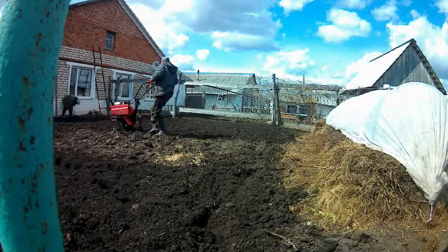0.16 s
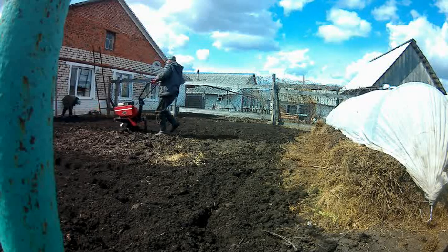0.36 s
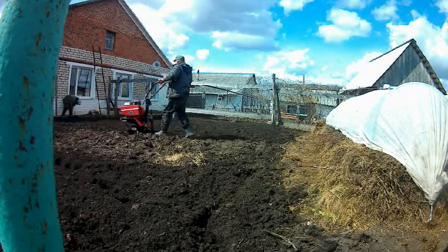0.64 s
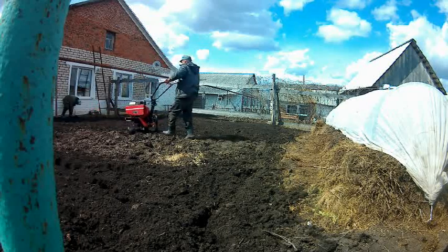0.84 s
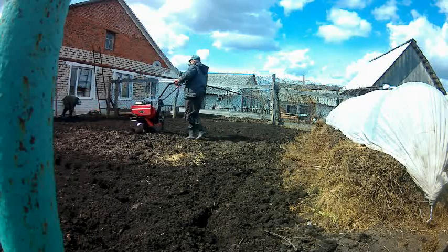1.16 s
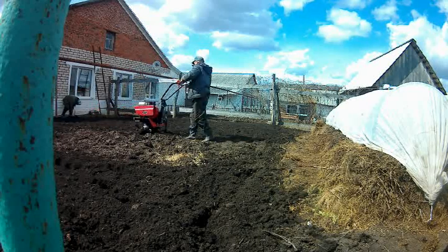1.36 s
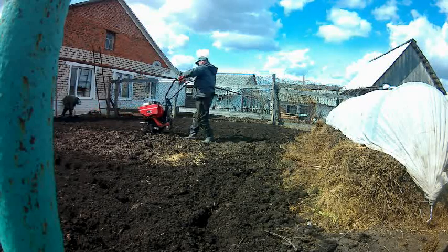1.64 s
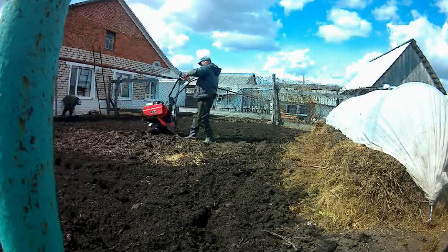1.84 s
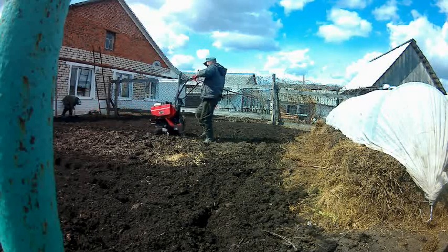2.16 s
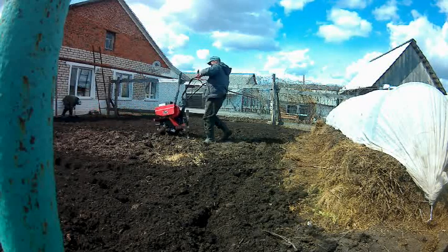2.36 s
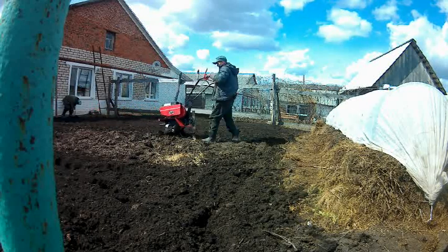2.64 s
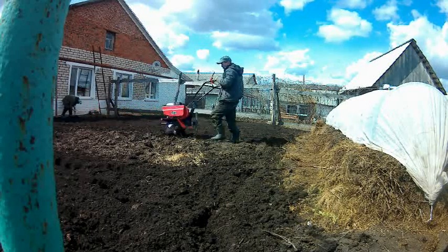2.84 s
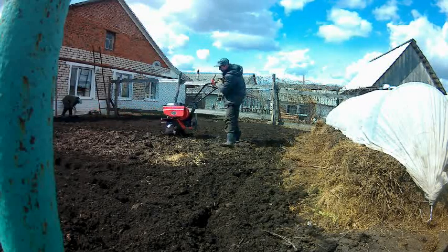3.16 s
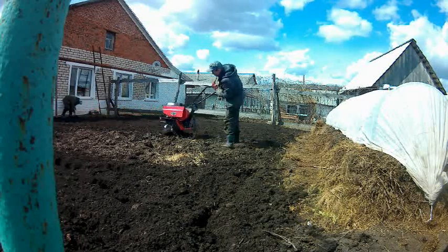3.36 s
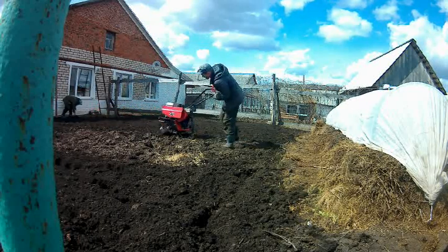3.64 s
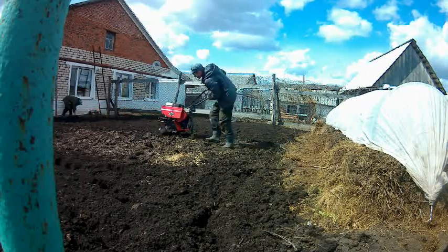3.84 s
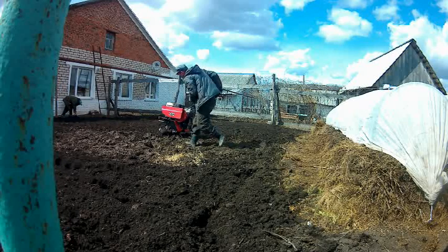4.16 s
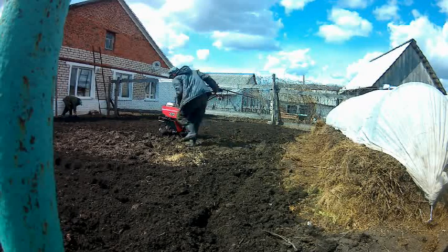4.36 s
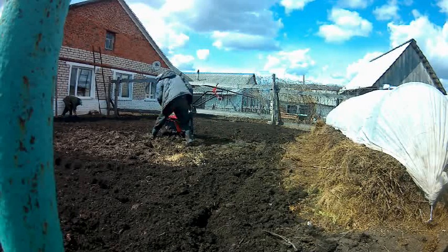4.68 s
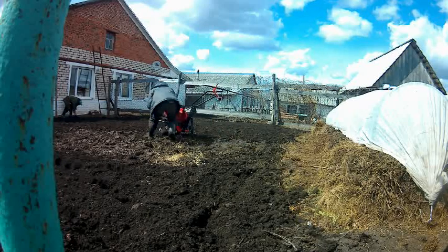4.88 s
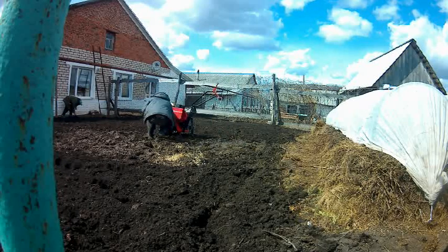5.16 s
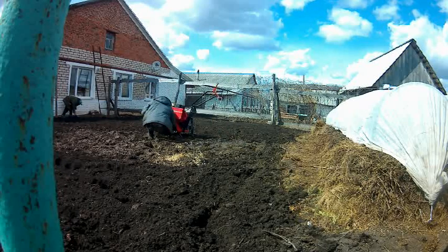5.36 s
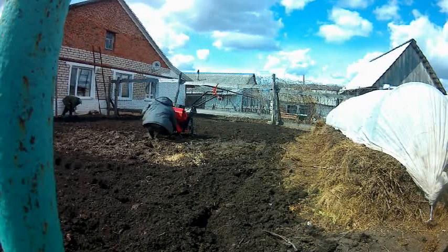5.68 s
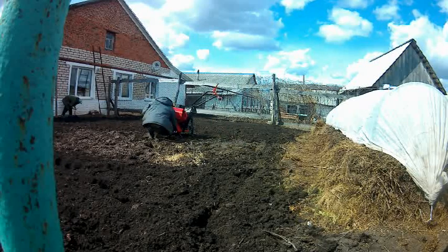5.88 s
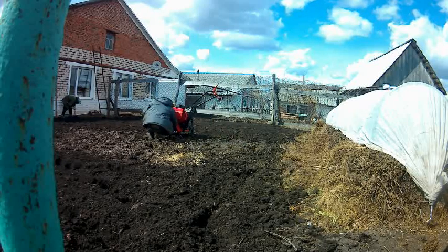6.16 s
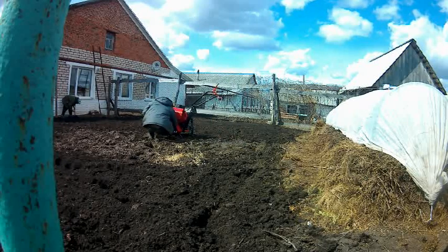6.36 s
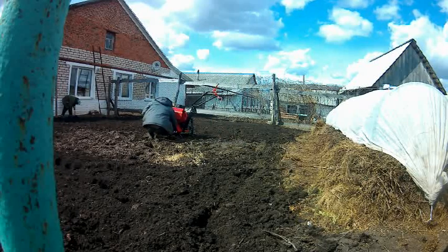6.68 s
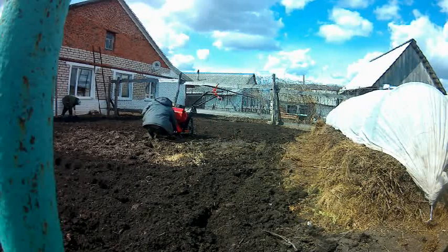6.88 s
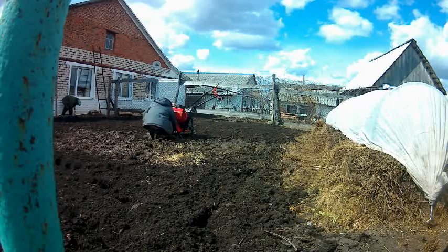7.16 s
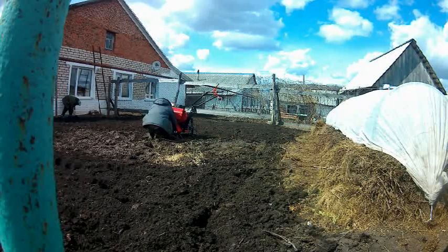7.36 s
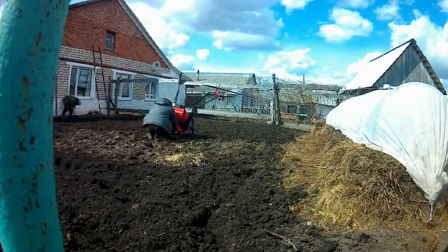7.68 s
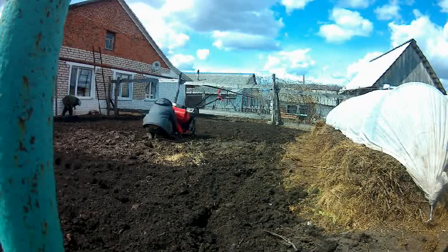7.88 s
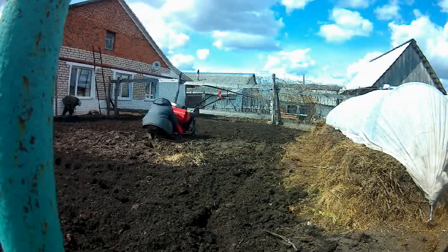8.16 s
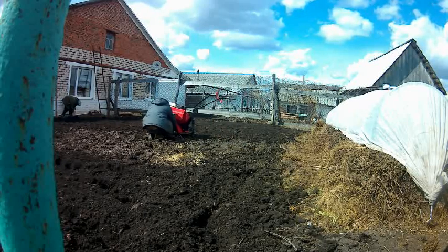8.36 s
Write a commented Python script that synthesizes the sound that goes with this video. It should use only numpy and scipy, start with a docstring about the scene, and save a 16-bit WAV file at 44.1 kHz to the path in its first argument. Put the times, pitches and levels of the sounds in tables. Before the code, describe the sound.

A small petrol garden tiller chugs outdoors a few metres away. For about three seconds its blades scrape through soil and crunch into clods, with a few sharp clicks, and the engine thumps deeper and sags under the load. Then the digging stops and the engine runs free, slightly faster, with a steady metallic rattle. Wind gusts rumble on the microphone, briefly overloading it just past the middle.

```python
"""A garden tiller chugs a few metres away, digging for about three seconds, then running free.
Its one-cylinder, four-stroke engine puffs out exhaust, gulps in air and rattles its metal on every cycle.
The tines (digging blades) scrape soil, bite clods and drag the engine's speed down.
A few sharp clicks sound during the digging. Wind buffets the microphone, which overloads softly."""
import sys
import numpy as np
from scipy import signal
from scipy.fft import rfft, irfft, next_fast_len
from scipy.io import wavfile
from scipy.ndimage import uniform_filter1d

SR = 44100
rng = np.random.default_rng(int(sys.argv[2]) if len(sys.argv) > 2 else 0)


def wrap_up_sound(samples):
    """Save the sound to the file named by the first command line argument, as 16-bit audio."""
    columns = np.atleast_2d(samples).T
    # keep every value between -1 and 1, then stretch to whole-number steps
    tamed = np.clip(columns, -1, 1)
    steps = np.round(tamed * 32767).astype(np.int16)
    wavfile.write(sys.argv[1], SR, steps)


N = 375732
T = np.arange(N) / SR

# tones of the engine running free: harmonic (multiple of the firing rate), level_db
FREE_TONES = [(1, -5), (2, -2), (3, -8), (4, -6), (5, 0), (6, -4), (7, -16), (8, -15), (9, -12), (10, -12),
              (11, -24), (12, -23), (13, -21), (14, -24), (15, -30), (16, -19), (17, -30), (18, -29),
              (19, -31), (20, -36), (21, -34), (22, -33), (23, -32), (24, -32), (25, -33), (26, -30),
              (27, -33), (28, -23), (29, -31), (30, -30), (31, -27), (32, -27), (33, -24), (34, -31),
              (35, -30), (36, -26), (37, -31), (38, -29), (39, -28), (40, -26), (41, -31), (42, -33),
              (43, -27), (44, -29), (45, -25), (46, -24), (47, -33), (48, -32), (49, -28), (50, -30),
              (51, -32), (52, -31)]
# narrow peaks and dips that colour the rattle and scraping: pitch_hz, width_hz, gain_db
TREBLE_COLOUR = [(1058,104,3.5),(1743,13,4.5),(2625,47,3.5),(4010,263,-12),(4840,45,4),(5210,52,2.5),(5960,290,-5.5),(6800,160,2.5),(7950,1050,-15.5),(9270,280,6),(10880,180,5),(12030,300,-8)]


def undb(db):
    """Turn decibels into a gain."""
    return 10 ** (np.asarray(db) / 20)


def unit(x):
    """Scale a sound to an average (rms) level of 1."""
    return x / np.sqrt(np.mean(x ** 2))


def curve(rows):
    """Join (time_s, value) points with straight lines."""
    return np.interp(T, *np.transpose(rows))


def wander(rate_hz):
    """A smooth random drift, typically about 1 either side of zero."""
    hold = max(int(SR / rate_hz), 2)
    steps = np.repeat(rng.standard_normal(N // hold + 2), hold)
    return 1.46 * uniform_filter1d(steps, hold)[rng.integers(hold):][:N]


def colour(x, outline, peaks=()):
    """Filter a sound with a (pitch_hz, gain_db) outline plus rounded peaks and dips."""
    size = 2 * next_fast_len(N // 2 + SR // 4)
    freqs = np.arange(size // 2 + 1) * SR / size
    hz, db = np.transpose(outline)
    db = np.interp(np.log(freqs + 1), np.log(hz), db)
    for pitch_hz, width_hz, gain_db in peaks:
        db = db + gain_db * np.exp(-((freqs - pitch_hz) / width_hz) ** 2)
    # make the filter ring only after a hit, never before it
    cepstrum = irfft(np.log(undb(db)))
    cepstrum[1:size // 2] *= 2
    cepstrum[size // 2 + 1:] = 0
    return irfft(rfft(x, size) * np.exp(rfft(cepstrum)))[:N]


def bursts(hits, decay_s, rise_s):
    """Noise that swells and dies away at each (start_s, level_db)."""
    envelope = np.zeros(N)
    age = T[:SR // 4]
    for start_s, level_db in hits:
        shape = undb(level_db) * (1 - np.exp(-age / rise_s)) * np.exp(-age / decay_s)
        start = int(start_s * SR)
        envelope[start:start + len(shape)] += shape[:N - start]
    return envelope * rng.standard_normal(N)


def wind(breeze_db=-26.5, eddy_db=-3.0, gust_width_s=0.12, shove_width_s=0.014):
    """Air rumbles on the microphone; stronger gusts shed faster swirls, and a few shove hard."""
    # gusts that swell and fade: peak_s, level_db
    gusts = [(.83, -23.5), (1.45, -23), (1.78, -17), (2.2, -19.5), (2.48, -17), (2.87, -14.5),
             (3.95, -15.5), (4.22, -14.5), (4.42, -17.5), (4.95, -17), (5.15, -17.5), (5.58, -21),
             (6.78, -21.5)]
    # tone of the low rumble: pitch_hz, gain_db
    rumble_tone = [(3,-3),(10,0),(24,0),(40,-8),(70,-16),(120,-25),(300,-44),(1000,-78),(4000,-120)]
    # tone of the swirls in a gust: pitch_hz, gain_db
    eddy_tone = [(20,-15),(45,3),(70,-1),(120,-8.5),(300,-36),(1000,-79),(4000,-120)]
    # single pushes of air: peak_s, pressure (1 is full scale)
    shoves = [(4.918, 0.8), (4.967, 1.1), (5.113, -1.15), (5.157, 0.44)]
    gust_power = sum((undb(db) * np.exp(-((T - s) / gust_width_s) ** 2 / 2)) ** 2 for s, db in gusts)
    strength = np.sqrt(undb(breeze_db) ** 2 + gust_power)
    rumble = unit(colour(rng.standard_normal(N), rumble_tone)) * strength
    eddies = unit(colour(rng.standard_normal(N), eddy_tone)) * strength ** 2 / strength.max()
    thumps = sum(pressure * np.exp(-((T - s) / shove_width_s) ** 2) for s, pressure in shoves)
    return rumble + undb(eddy_db) * eddies + thumps


def sharp_clicks():
    """Short, bright clicks during the digging."""
    # clicks: start_s, level_db
    clicks = [(1.297,-3.5),(1.989,-3.5),(2.063,-1),(2.368,-4),(2.371,4.5)]
    # tone of the clicks: pitch_hz, gain_db
    click_tone = [(300,-21),(1000,11),(3500,2.5),(6000,-7),(9000,-9.5),(13000,-13),(16000,-20)]
    return undb(2.5) * colour(bursts(clicks, decay_s=0.0009, rise_s=0.0003), click_tone)


def sag(t, slope_s=0.142):
    """Firing rate lost (Hz): each dig slows the engine and its governor (speed control) restores it."""
    # the tines digging in: slowest_s, drop_hz
    digs = [(.21, 1.0), (.64, 1.1), (.96, 1.9), (1.34, 2.4), (1.6, 1.7), (2.03, 2.05), (2.41, 2.3),
            (2.73, 1.85)]
    return sum(drop_hz * np.maximum(1 - np.abs(t - s) / slope_s, 0) for s, drop_hz in digs)


def tines_in_soil(throttle, grains_per_s=6000, blade_hz=13.2, drag_db_per_hz=2, lead_s=0.015):
    """Grit scrapes the blades, surging as each one enters the ground, and clods crunch against them."""
    # tone of blades in soil: pitch_hz, gain_db
    soil_tone = [(200,-6),(420,-5.5),(680,-3.5),(1100,1),(1500,-2.5),(2100,-7),(3200,-9),(3800,-15),(4800,-17.5),(6600,-24),(7800,-36.5),(10500,-32.5),(13500,-33),(14600,-60)]
    # bites into clods: start_s, level_db
    clods = [(.898,-.5),(.92,-4),(1.03,-2.5),(1.135,-3),(1.2,-11),(1.23,1.5),(1.255,-5.5),(1.294,-3.5),(1.315,-1.5),(1.347,-2.5),(1.419,-1.5),(1.488,-5),(1.53,1),(1.555,-4),(1.664,-6),(1.685,.5),(1.983,.5),(2.014,-4),(2.06,-2),(2.146,-7),(2.353,-3),(2.367,-1.5),(2.39,-6),(2.439,0),(2.495,-6.5),(2.528,-7),(2.806,-5.5)]
    grit = (rng.random(N) < grains_per_s / SR) * rng.standard_normal(N)
    grit *= undb(2.5 * np.minimum(rng.exponential(size=N), 4))  # a few grains are louder
    surge = undb(-0.5 * np.sin(2 * np.pi * blade_hz * T) + 1.9 * wander(70))
    scrape = unit(colour(grit * surge, soil_tone, TREBLE_COLOUR))
    # scraping grows with the drag, which comes just before the engine slows
    scrape_db = -28.5 + drag_db_per_hz * sag(T + lead_s)
    crunch = colour(bursts(clods, decay_s=0.013, rise_s=0.0029), soil_tone, TREBLE_COLOUR)
    return scrape * np.sqrt(throttle) * undb(scrape_db) + undb(0.4) * crunch


def metal_buzz(cycle, firing_hz, waver_db=2.5, db_per_octave=-0.6):
    """Tank and guards buzz at the engine's high tones, which slide through resonances as it slows."""
    buzz = np.zeros(N)
    harmonics, levels_db = np.transpose(FREE_TONES)
    for k in harmonics[12:]:
        phase = 2 * np.pi * (k * cycle + rng.random()) + 0.16 * wander(9)
        db = np.interp(k * firing_hz / firing_hz[-1], harmonics, levels_db) + db_per_octave * np.log2(k)
        buzz += undb(db + waver_db * wander(4)) * np.cos(phase)
    return unit(buzz)


def metal_clatter(cycle, scatter_db=3.0, decay_gaps=0.9, fan=1.0, repeat=0.61):
    """Valves, piston and loose guards knock at uneven points of the cycle over the cooling fan's rush."""
    # where the knocks fall: fraction of a cycle after the exhaust puff
    knock_points = [0, .17, .33, .58, .72, .86]
    # tone of the rattling housing: pitch_hz, gain_db
    housing_tone = [(100,1.5),(300,7),(420,1),(520,1.5),(680,-5),(1000,-0.5),(1450,0.5),(2000,-9),(3000,-10.5),(3800,-18.5),(4700,-21),(6600,-22.5),(8000,-30.5),(13500,-37),(14100,-67)]
    count = len(knock_points)
    # the whole part numbers the knock; the fraction runs through the gap to the next one
    knock = np.floor(cycle + 1) * count + np.interp(cycle % 1, knock_points + [1], np.arange(count + 1))
    sizes = undb(scatter_db * rng.standard_normal(int(knock[-1]) + 1))
    envelope = fan + sizes[knock.astype(int)] * np.exp(-(knock % 1) / decay_gaps)
    # the same parts meet at the same points, so some of the rattle repeats every cycle
    pattern = rng.standard_normal(int(N / cycle[-1]))
    rattle = rng.standard_normal(N) + repeat * pattern[(cycle % 1 * len(pattern)).astype(int)]
    return unit(colour(envelope * rattle, housing_tone, TREBLE_COLOUR))


def beat(cycle, tones, intake_lag, intake_size, ring, ring_hz, sharpness):
    """The exhaust puffs, the intake sucks intake_lag of a cycle later, and both ring the silencer."""
    pulses = np.zeros(N)
    average_hz = cycle[-1] / T[-1]
    for k, level_db in tones:
        pitch_ratio = k * average_hz / ring_hz
        silencer = 1 + ring / (1 + 1j * sharpness * (pitch_ratio - 1 / pitch_ratio))
        strokes = 1 - intake_size * np.exp(-2j * np.pi * k * intake_lag)
        # strokes and silencer set each tone's timing; the table sets its level
        pulses += undb(level_db) * np.cos(2 * np.pi * k * cycle + np.angle(strokes * silencer))
    return unit(pulses)


def exhaust_and_intake(cycle, throttle):
    """At low throttle the silencer rings after each stroke; wide open it gives a deep, dull thump."""
    # engine tones in light work: harmonic, level_db
    light_tones = [(1,-1),(2,-8),(3,-3),(4,-6),(5,0),(6,-4),(7,-9),(8,-13),(9,-15),(10,-12),(11,-21),(12,-25)]
    # engine tones when digging deep: harmonic, level_db
    deep_tones = [(1,1),(2,-3),(3,-8),(4,-11),(5,-1),(6,-3),(7,-6),(8,-20),(9,-18),(10,-8),(11,-21),(12,-21),(13,-19),(14,-15),(15,-20),(16,-20)]
    ringing = dict(intake_lag=0.287, intake_size=1.0, ring=1.7, ring_hz=152, sharpness=11)
    thumping = dict(intake_lag=0.252, intake_size=0.9, ring=6, ring_hz=100, sharpness=1)
    free = undb(-15.5) * beat(cycle, FREE_TONES[:12], **ringing)
    light = undb(-17.5) * beat(cycle, light_tones, **ringing)
    deep = undb(-17) * beat(cycle, deep_tones, **thumping)
    free_share = np.clip(1 - 2 * throttle, 0, 1)
    deep_share = np.clip(2 * throttle - 1, 0, 1)
    blend = free_share * free + (1 - free_share - deep_share) * light + deep_share * deep
    # no two firings burn alike, least of all in hard work
    return blend * undb((0.3 + 0.9 * throttle) * wander(30))


def scene():
    """Engine, digging and wind together, in one channel."""
    # speed the governor holds, a little higher once the tines stop: time_s, firing_hz
    held_speed = [(0, 29.62), (2.95, 29.65), (3.15, 30.54), (4.4, 30.54), (5.6, 30.76), (8.52, 30.69)]
    # how hard the engine works: time_s, throttle (0 running free, 0.5 light work, 1 digging deep)
    effort = [(0,.5),(.7,.5),(1.0,1),(2.8,1),(3.15,0)]
    # rattle and buzz duck briefly in the strongest gusts, then stay a little quieter: time_s, gain_db
    metal_level = [(0, -.5), (3.0, 0.5), (3.3, -0.9), (4.0, -0.8), (4.3, -2.1), (4.72, 0), (4.93, -5.5),
                   (5.35, -2.5), (8.52, -2.5)]
    throttle, metal_db, sag_hz = curve(effort), curve(metal_level), sag(T)
    firing_hz = curve(held_speed) - sag_hz
    cycle = np.cumsum(firing_hz) / SR - 0.16  # running count of engine cycles
    pickup_db = -3.5 * np.maximum(1 - T / 0.6, 0)  # the beat firms up as the work begins
    governor_db = 1.1 * sag_hz  # the governor opens up against each slowdown
    engine = exhaust_and_intake(cycle, throttle) * undb(governor_db + pickup_db)
    engine += metal_buzz(cycle, firing_hz) * undb(-30 - 2 * throttle + metal_db)
    engine += metal_clatter(cycle) * undb(-26.5 - 0.5 * throttle + metal_db)
    return (engine + tines_in_soil(throttle) + sharp_clicks() + wind())[None]


def record(dry, ceiling=0.57, knee=4.5, top_hz=15400):
    """The microphone rounds off big swings, choking the treble as it overloads; the very top is cut."""
    rounded = dry / (1 + np.abs(dry / ceiling) ** knee) ** (1 / knee)
    low_pass = signal.ellip(8, 0.2, 70, top_hz, fs=SR, output="sos")
    return signal.sosfilt(low_pass, rounded)


dry = scene()
out = record(dry)
wrap_up_sound(out)
```